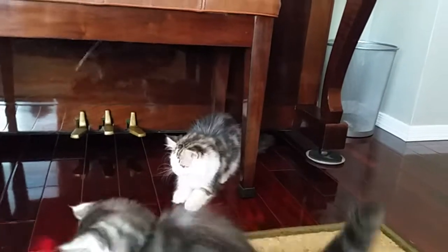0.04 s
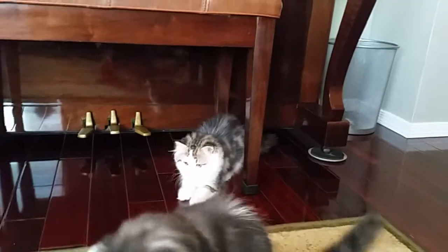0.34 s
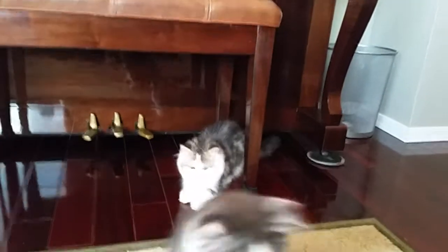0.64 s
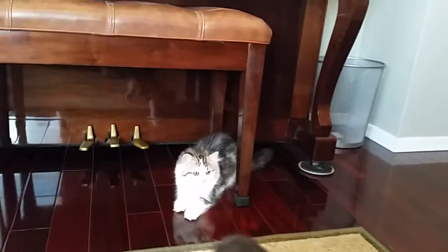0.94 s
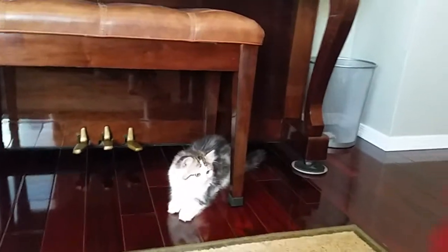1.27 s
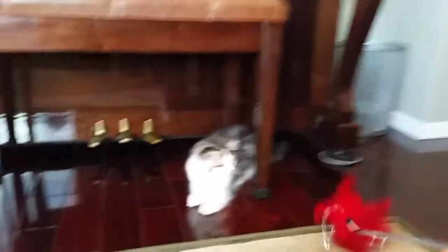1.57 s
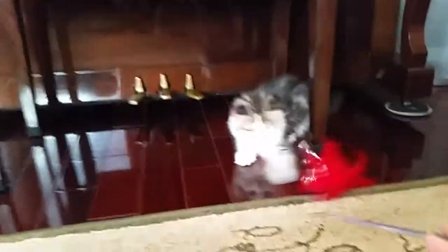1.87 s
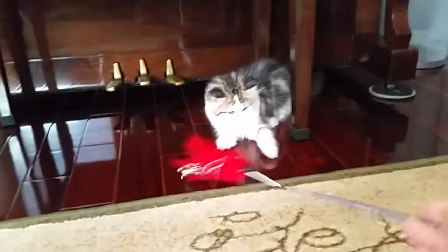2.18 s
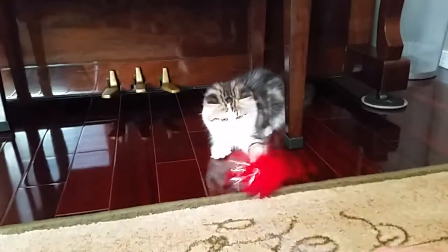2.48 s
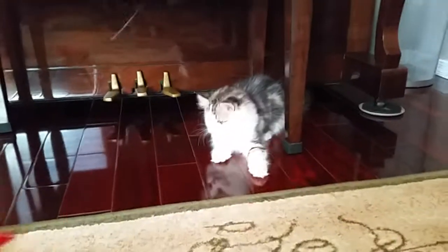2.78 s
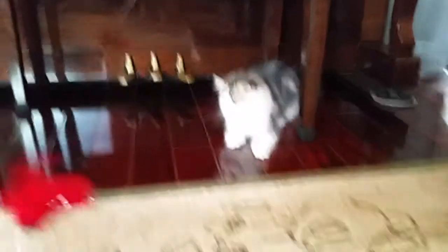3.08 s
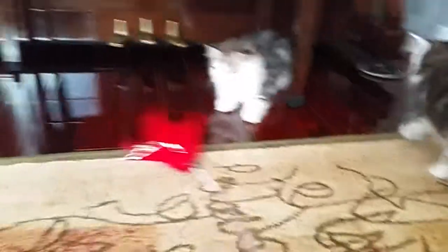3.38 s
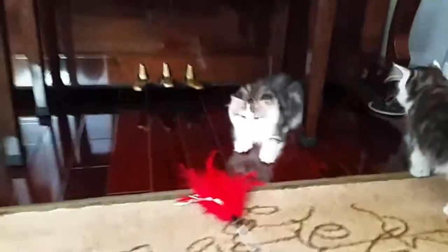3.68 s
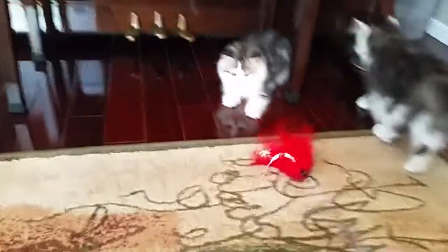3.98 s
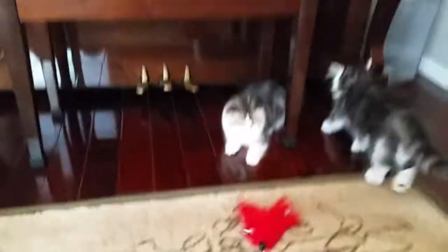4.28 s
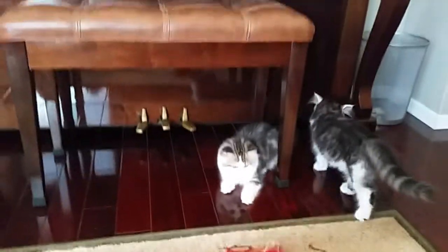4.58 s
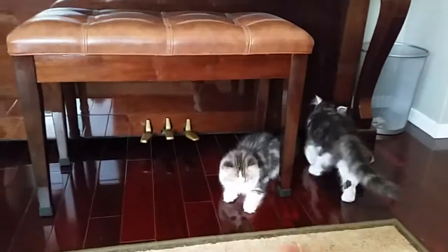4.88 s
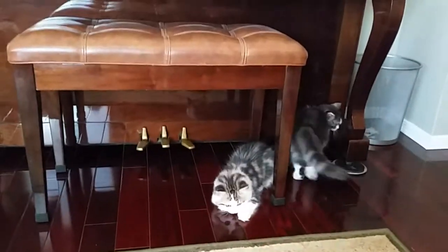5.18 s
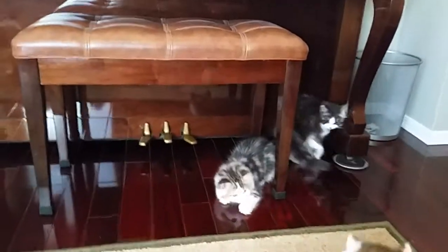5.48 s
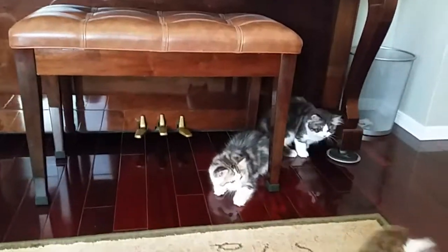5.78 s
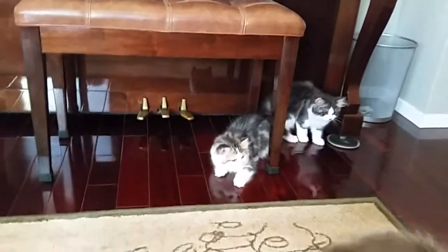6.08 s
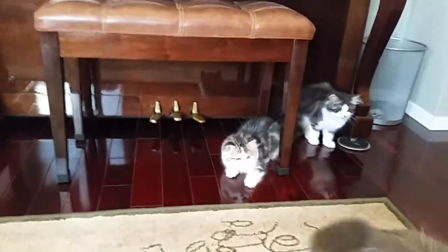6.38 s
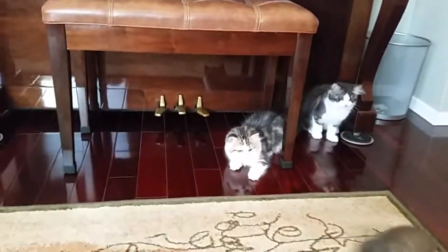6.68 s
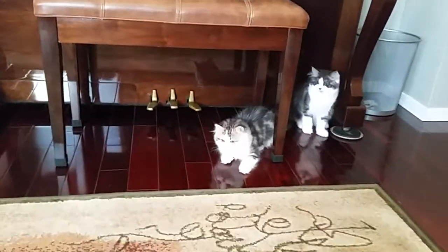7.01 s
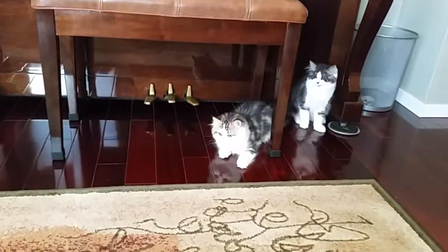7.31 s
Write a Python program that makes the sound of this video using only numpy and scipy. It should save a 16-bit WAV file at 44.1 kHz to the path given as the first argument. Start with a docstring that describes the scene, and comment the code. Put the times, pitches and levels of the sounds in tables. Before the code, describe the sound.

Faint, crisp crinkles of a feather-and-foil toy mix with soft low thumps of kittens playing, over a slight hum and hiss.

```python
"""A faint rustle over room air, then bright snaps and soft bumps: kittens play with a feather-and-tinsel
wand on a wooden floor and a rug. Foil strands tick and buckle high in the treble. Paws pat the boards;
low bumps of play and handling reach mostly the left microphone.
Underneath: the air of a quiet room, a faint mains hum and a narrow microphone hiss."""
import sys
import numpy as np
from scipy import signal
from scipy.fft import rfft, irfft
from scipy.io import wavfile
from scipy.ndimage import uniform_filter1d

SR = 44100
rng = np.random.default_rng(int(sys.argv[2]) if len(sys.argv) > 2 else 0)


def wav_record(signal):
    """Record a signal, one row per channel, as 16-bit PCM in the file named by sys.argv[1]."""
    frames = np.transpose(np.atleast_2d(signal))
    bounded = np.clip(frames, -1, 1)
    # unit amplitude maps onto the largest positive 16-bit level
    quanta = np.round(bounded * 32767).astype(np.int16)
    wavfile.write(sys.argv[1], SR, quanta)


N = 328545
TIME = np.arange(N) / SR

# Spells of wand motion. Each row: start and end in seconds, relative level in dB, upper-treble lift in dB.
WAND_BOUTS = [(0, 0.06, -71, -2), (0.518, 1.196, -59, 5), (1.424, 1.56, -68.5, 2), (1.57, 2.593, -57, 1.5),
              (2.622, 3.28, -58, -9), (3.883, 4.48, -80.5, 0), (4.497, 5.822, -60, -2.5),
              (5.996, 6.342, -69, 5), (6.346, 7.45, -61, 6)]
# Single shakes. Each row: crest in seconds, relative level in dB, length in seconds,
# upper-treble lift in dB.
WAND_SHAKES = [(0.37, -67, .015, -3), (0.44, -66.5, 0.033, -1), (0.567, -41.5, 0.0072, 2),
               (0.667, -39, 0.024, -4), (0.72, -42, .03, 3), (1.76, -50, .04, 3), (1.939, -40, 0.045, -7),
               (2.114, -41.5, 0.033, 0), (2.27, -46.5, 0.17, -4), (2.538, -46, 0.089, 1),
               (2.82, -52.5, 0.055, 5), (2.893, -50.5, 0.046, -10), (3.037, -50, 0.19, 0),
               (3.225, -47, 0.057, -9), (3.377, -50.5, 0.027, -11), (4.263, -68, .035, -2),
               (4.737, -47.5, 0.033, 5), (4.92, -44.5, 0.057, -6), (5.027, -47.5, .035, -2),
               (5.13, -50, 0.1, 4), (5.297, -53, .07, 6), (5.544, -47.5, 0.11, 0.5),
               (5.741, -46, 0.023, 3.5), (6.137, -54.5, 0.027, 3), (6.255, -57.5, 0.028, 7.5),
               (6.38, -50, 0.025, 6), (6.561, -52.5, 0.028, 12), (6.644, -61.5, 0.075, 14),
               (6.86, -50.5, .025, 2), (6.938, -43.5, 0.054, -8), (7.037, -46.5, .04, -2),
               (7.14, -44.5, 0.077, -2), (7.295, -44, 0.055, -5)]
# Wand direction. Each row: time in seconds, left over right in dB.
WAND_PAN = [(0, 3), (.9, 1), (2.6, .5), (3.25, 7.5), (3.5, 3), (6.2, -1), (7.45, 0.5)]
# Foil strand pitches in Hz.
FOIL_PITCHES_HZ = [9880, 10760, 12270, 12200, 13900, 14500]
# Flicks of the tuft. Each row: crest in seconds, relative level in dB, fade in seconds.
TUFT_SWATS = [(.702, -33.5, 0.016), (1.066, -31.5, 0.027), (2.103, -37, 0.021), (5.121, -37, 0.011),
              (6.405, -37, 0.022), (7.278, -40.5, 0.073)]
# Buckling strands. Each row: start in seconds, relative peak in dB, pitch in Hz, left over right in dB.
STRAND_SNAPS = [(.556, -27.5, 11500, 5), (.613, -30, 11600, 2), (.649, -30, 14900, 5),
                (.705, -20, 15000, 9), (0.7118, -15, 14000, 17), (.7284, -17, 14600, 8),
                (0.7543, -17.5, 12700, -2), (.938, -34, 14700, 12), (1.0674, -16, 11400, -9),
                (1.188, -29, 13600, -4), (2.193, -26, 15400, -5), (2.2957, -23.5, 10950, -4),
                (2.606, -23, 10600, 1.5), (2.79, -29, 14200, 14), (3.253, -24, 11300, 6),
                (3.3406, -30.5, 11700, 2), (4.6353, -34, 15200, 7), (4.7251, -27.5, 11100, -2),
                (4.869, -31, 13000, 2.5), (4.931, -24, 13800, 5), (5.12, -30, 15000, -2),
                (6.214, -33.5, 12200, 3), (6.403, -19, 14500, 4), (6.5606, -29, 15300, -15),
                (6.6322, -27, 15000, -12), (7.1262, -21, 11400, 7)]
# Soft bumps. Each row: start in seconds, level in dB, pitch in Hz, relative knock level in dB.
SOFT_BUMPS = [(0.572, -34, 87, -21), (1.452, -42, 98, -8.5), (1.53, -40, 83.4, -24),
              (1.659, -30.5, 100, -35), (1.689, -33, 147, -34), (1.705, -28, 104, -22.5),
              (1.756, -33, 128, -34), (1.823, -36, 108, -24), (2.065, -36, 98, -18),
              (2.145, -34.5, 95, -11), (2.191, -31, 86.6, -35), (2.541, -33, 77, -14),
              (3.052, -39, 142, -28), (3.079, -32.5, 85, -21), (3.094, -27, 96, -18.5),
              (3.131, -32.5, 66, -19.5), (3.155, -32, 120, -21), (3.247, -27.5, 88, -24),
              (3.275, -40, 121, -10), (3.382, -38, 106, -15), (3.481, -31.5, 99, -31),
              (3.641, -37.5, 121, -22), (3.803, -26.5, 99, -25.5), (4.49, -38.5, 145, -30),
              (4.613, -33, 104, -35), (4.759, -35, 88, -35), (5.539, -35, 112, -23),
              (7.308, -37.5, 68, -26)]
# Hard taps on the boards. Each row: start in seconds, level in dB, left over right in dB.
BOARD_TAPS = [(.509, -44.5, 8), (0.707, -43, 6), (.735, -33.5, -16), (1.066, -54, -5), (6.402, -29, -8)]
# Short hollow notes of the boards: low paw pats, and the higher double ring of the hard tap at 6.4 s.
# Each row: start in seconds, level in dB, pitch in Hz.
BOARD_NOTES = [(0.799, -49, 288), (0.84, -59, 336), (5.552, -44.5, 343), (6.25, -46.5, 326),
               (6.334, -56, 310), (6.402, -54, 1010), (6.414, -51, 965), (7.06, -45.5, 335),
               (7.159, -50.5, 383), (7.271, -52, 270), (7.343, -43, 243)]

# Level curves. Each row: time in seconds, relative level in dB.
SHUFFLE_LEVEL = [(0, -64), (1.3, -59), (1.7, -43.5), (2.2, -47.5), (2.8, -52.5), (3.2, -47.5), (3.7, -46),
                 (4.1, -53.5), (5.5, -62), (7.45, -64)]
AIR_AND_HISS_LEVEL = [(0.0, -61.5), (0.1, -60.5), (0.29, -63), (0.89, -58.5), (1.33, -59.5), (3.26, -58),
                      (4.38, -62), (5.1, -58), (6.02, -60), (6.35, -58), (7.43, -58), (7.45, -56)]

# Spectra. Each row: frequency in Hz, relative level in dB.
TINSEL_SPECTRUM = [(500, -33), (2000, -26), (4500, -22), (7500, -21), (8500, -15.5), (9400, -4),
                   (10200, -2.5), (11500, 1.5), (13500, -5), (15500, 2), (17000, -17.5)]
KNOCK_SPECTRUM = [(60, -9), (160, -3.5), (240, 9), (400, 0), (900, -8), (1200, -22.5), (3000, -30),
                  (8000, -79)]
TAP_SPECTRUM = [(200, -17), (900, -4), (2000, -7.5), (3500, 0.5), (5500, -3.5), (8500, -1.5), (11000, 6),
                (16000, 4)]
SCRAPE_SPECTRUM = [(700, -38), (1250, -4), (1550, 2), (1720, 1), (1950, -20), (3000, -42)]
SHUFFLE_SPECTRUM = [(10, -20), (35, -3), (65, 0), (110, -2.5), (170, -4), (300, -25.5), (600, -25),
                    (2000, -71.5)]
AIR_SPECTRUM = [(15, -8), (30, -7.5), (60, -1), (105, 2.5), (170, -10.5), (260, -13), (450, -17.5),
                (900, -19.5), (1300, -25), (2000, -37.5), (3600, -27), (6500, -51), (8500, -88),
                (11000, -40), (16000, -40.5)]
HISS_SPECTRUM = [(1500, -32), (2400, -30.5), (2800, -14.5), (3150, -1.5), (3450, 3), (3850, 0.5),
                 (4300, -8.5), (4900, -27), (6500, -33.5)]

# Width of the room air. Each row: frequency in Hz, left-right correlation.
AIR_CORRELATION = [(30, 0.55), (120, 0.85), (300, 0.68), (700, 0.065), (2000, 0.029), (16000, 0.033)]
# Balance of the room air. Each row: frequency in Hz, left over right in dB.
AIR_PAN = [(40, 10), (110, -2), (400, -1.5), (900, 8), (2000, -1), (12000, 1.5)]
# Room decay. Each row: frequency in Hz, T60 in seconds.
ROOM_T60 = [(200, 0.5), (1000, 0.37), (4000, 0.84), (8000, 0.48), (15000, 0.1)]
# Notches of the left microphone port. Each row: frequency in Hz, gain in dB.
LEFT_PORT_GAIN = [(4600, 1), (5800, -14.5), (7000, -4), (8400, -25.5), (10000, 1)]


def rustle(gain_db=2.5, upper_db=0.5, clump_db=2.0, split_hz=12500):
    """Foil strands tick against each other, each pitch in its own short clumps."""
    out = np.zeros((2, N))
    lower, upper = tuft_motion()
    for hz in FOIL_PITCHES_HZ:
        clumps = wander(400, 150)
        motion = upper * amp(upper_db) if hz > split_hz else lower
        strength = motion * amp(gain_db + clump_db * np.minimum(clumps, 2))
        ticks = through(strength * crackle(per_s=400, spread_db=1.5), strand_tick(hz))
        out += room(ticks, early_db=-5, late_db=-6)
    return out * pan(curve(WAND_PAN)) / np.sqrt(len(FOIL_PITCHES_HZ))


def tuft_motion(rest_db=-81.5, surge_db=1.73):
    """Lower- and upper-treble tick strength: bouts and shakes add in power and surge unevenly."""
    moves = [(amp(db) * swell(start_s, end_s, rise_s=0.017, fade_s=0.052), lift_db)
             for start_s, end_s, db, lift_db in WAND_BOUTS]
    moves += [(amp(db) * swell(crest_s, crest_s, 0.66 * length_s, 0.85 * length_s), lift_db)
              for crest_s, db, length_s, lift_db in WAND_SHAKES]
    lower_power = sum(move ** 2 for move, _ in moves)
    upper_power = sum((move * amp(lift_db)) ** 2 for move, lift_db in moves)
    surge = amp(surge_db * wander(1200, 400))
    return np.sqrt(np.array([lower_power, upper_power]) + amp(rest_db) ** 2) * surge


def strand_tick(pitch_hz, boost_db=9, log_width=0.041):
    """One foil tick: the tinsel spectrum, raised around the strand's pitch."""
    hz = np.geomspace(300, 20000, num=120)
    peak_db = boost_db * np.exp(-(np.log(hz / pitch_hz) / log_width) ** 2)
    return impulse(np.column_stack([hz, at_hz(TINSEL_SPECTRUM, hz) + peak_db]), fft_size=512)


def swats(gain_db=-1, pan_db=-0.5):
    """A flick of the tuft sets off a dense, fast-fading burst of ticks."""
    envelope = sum(amp(db + gain_db) * (TIME >= start_s) * np.exp(-abs(TIME - start_s) / fade_s)
                   for start_s, db, fade_s in TUFT_SWATS)
    clicks = pan(pan_db) * envelope * crackle(per_s=1800, spread_db=2.0)
    return room(through(clicks, impulse(TINSEL_SPECTRUM)), early_db=-0.5, late_db=-1.0)


def snaps(gain_db=-4, rebound=0.57, rebound_s=0.0028):
    """One strand buckles with a sharp tick; its neighbours rebound."""
    out, t = np.zeros((2, N)), TIME[:500]
    for start_s, db, hz, pan_db in STRAND_SNAPS:
        signs = rng.choice([-1, 1], (2, len(t)))
        clicks = rebound * signs * (rng.random(len(t)) < .25) * np.exp(-t / rebound_s)
        clicks[:, 0] = 1  # the buckle
        tick = strand_tick(hz, boost_db=11.5, log_width=0.15)
        add(out, start_s, amp(db + gain_db) * pan(pan_db) * through(clicks, tick / abs(tick).max()))
    return room(out, early_db=-7, late_db=-5)


def bumps(knock_db=11, overtone_ratio=2.32, overtone_db=-11, pan_db=19):
    """Heavily damped low pushes, each with one overtone and a small woody knock."""
    out, knock = np.zeros((2, N)), impulse(KNOCK_SPECTRUM)
    for start_s, db, hz, hard_db in SOFT_BUMPS:
        push = thud(hz, rise_cycles=0.37) + amp(overtone_db) * thud(hz * overtone_ratio, rise_cycles=0.84)
        add(out, start_s, amp(db) * pan(pan_db) * push)
        add(out, start_s, amp(db + hard_db + knock_db) * pan(pan_db) * knock / abs(knock).max())
    return room(out, early_db=-11, late_db=-14)


def taps(contact_s=0.0021):
    """Short, hard contacts with the boards set the room ringing."""
    blows, t = np.zeros((2, N)), TIME[:400]
    for start_s, db, pan_db in BOARD_TAPS:
        burst = rng.standard_normal((2, len(t))) * np.exp(-t / contact_s)
        add(blows, start_s, amp(db) * pan(pan_db) * burst)
    return room(through(blows, impulse(TAP_SPECTRUM)), early_db=-3, late_db=-2.5)


def board_notes(pan_db=1):
    """The boards answer paws, and one hard tap, with short hollow notes."""
    out = np.zeros((2, N))
    for start_s, db, hz in BOARD_NOTES:
        add(out, start_s, amp(db) * pan(pan_db) * thud(hz, rise_cycles=0.4))
    return room(out, early_db=6.5, late_db=2)


def thud(hz, rise_cycles):
    """A damped swing whose envelope peaks at 1 after rise_cycles."""
    cycles = hz * TIME[:6000]
    return cycles / rise_cycles * np.exp(1 - cycles / rise_cycles) * np.sin(2 * np.pi * cycles)


def scrape(start_s=1.12, end_s=1.425, level_db=-66):
    """One soft, brief slide: an arch of band noise."""
    progress = np.clip((TIME - start_s) / (end_s - start_s), 0, 1)
    return amp(level_db) * np.sqrt(abs(np.sin(np.pi * progress))) * noise(SCRAPE_SPECTRUM)


def shuffle(gain_db=-3, pan_db=10):
    """Many small bumps merge into a lumpy rumble."""
    lumps = unit_rms(through(crackle(per_s=110, spread_db=1.5), impulse(SHUFFLE_SPECTRUM)))
    return lumps * amp(curve(SHUFFLE_LEVEL) + gain_db) * pan(pan_db)


def room_air(gain_db=7.5):
    """Low room noise, most alike at the two microphones in the bass."""
    hz = np.fft.rfftfreq(N, 1 / SR)
    air = noise(AIR_SPECTRUM, at_hz(AIR_CORRELATION, hz)) * amp(curve(AIR_AND_HISS_LEVEL) + gain_db)
    return irfft(rfft(air) * pan(at_hz(AIR_PAN, hz)), N)


def mic_hiss(gain_db=2, pan_db=21):
    """Narrow hiss of the resonant left microphone port."""
    return noise(HISS_SPECTRUM) * amp(curve(AIR_AND_HISS_LEVEL) + gain_db) * pan(pan_db)


def mains_hum(hz=116.7, level_db=-62.5, waver=0.41):
    """One low tone, drifting in level and phase."""
    level_drift, phase_rad = wander(16000, 6000, shape=(2, N))
    envelope = np.sqrt(2) * amp(level_db) * (1 + waver * level_drift)
    return envelope * np.sin(2 * np.pi * hz * TIME + phase_rad)


def room(x, early_db, late_db, early_s=0.016):
    """Direct sound, quick reflections from floor and furniture, and the room's tail."""
    t = TIME[:SR // 2]
    shape = (2, len(t))
    echoes = rng.standard_normal(shape) * (rng.random(shape) < .15) * (t > .001)
    early = echoes * np.exp(-t / early_s)
    hz, frame_s, bins = signal.stft(rng.standard_normal(shape) * (t > .006), SR, nperseg=256)
    decay = amp(-60 * frame_s / at_hz(ROOM_T60, hz)[:, None])
    late = signal.istft(bins * decay, SR, nperseg=256)[1][:, :len(t)]
    response = amp(early_db) * unit_rms(early) + amp(late_db) * unit_rms(late)
    return x + through(x, response / np.sqrt(len(t)))


def crackle(per_s, spread_db):
    """Random clicks of unequal size, different at each microphone."""
    hits = rng.random(N) < per_s / SR
    sizes = amp(spread_db * np.minimum(rng.exponential(1, N), 4))
    mic_gains = rng.uniform(-1.29, 1.76, (2, N))
    return unit_rms(hits * sizes * mic_gains * rng.choice([-1, 1], N))


def noise(spectrum, correlation=0):
    """Steady coloured stereo noise, rms 1."""
    hz = np.fft.rfftfreq(N, 1 / SR)
    left, other = rfft(rng.standard_normal((2, N)))
    right = correlation * left + np.sqrt(1 - correlation ** 2) * other
    return unit_rms(irfft(np.array([left, right]) * amp(at_hz(spectrum, hz)), N))


def impulse(spectrum, fft_size=4096):
    """Minimum-phase impulse response of a spectrum, energy 1."""
    hz = abs(np.fft.fftfreq(fft_size, 1 / SR))
    log_gain = np.log(amp(at_hz(spectrum, hz)))
    response = np.exp(np.conj(signal.hilbert(log_gain)))
    pulse = np.fft.ifft(response).real[:fft_size // 2]
    return pulse / np.linalg.norm(pulse)


def wander(first_samples, second_samples, shape=N):
    """Noise smoothed by two moving averages, rms 1."""
    smooth = uniform_filter1d(rng.standard_normal(shape), first_samples)
    return unit_rms(uniform_filter1d(smooth, second_samples))


def swell(start_s, end_s, rise_s, fade_s):
    """Envelope: 1 from start to end, exponential flanks."""
    return np.exp(-np.maximum(start_s - TIME, 0) / rise_s - np.maximum(TIME - end_s, 0) / fade_s)


def pan(pan_db):
    """Left and right gains, mean power 1."""
    pair = np.array([amp(pan_db / 2), amp(-pan_db / 2)]).reshape(2, -1)
    return pair / np.sqrt(np.mean(pair ** 2, 0))


def at_hz(rows, hz):
    """Interpolates (Hz, value) rows on a log axis."""
    row_hz, values = np.transpose(rows)
    return np.interp(np.log(hz + 1), np.log(row_hz + 1), values)


def curve(rows):
    """Interpolates (seconds, value) rows at every sample."""
    return np.interp(TIME, *np.transpose(rows))


def add(mix, start_s, sound):
    part = mix[:, max(round(start_s * SR), 0):][:, :sound.shape[1]]
    part += sound[:, :part.shape[1]]


def through(x, response):
    return signal.fftconvolve(x, np.atleast_2d(response), axes=1)[:, :N]


def amp(db):
    return 10 ** (np.asarray(db) / 20)


def unit_rms(x):
    return x / np.sqrt(np.mean(x ** 2) + 1e-20)


def scene():
    """All sources at the two microphones."""
    tinsel = rustle() + swats() + snaps()
    floor = taps() + bumps() + board_notes() + scrape() + shuffle()
    return tinsel + floor + room_air() + mic_hiss() + mains_hum()


def record(dry, cutoff_hz=15900):
    """The left port notches the mid treble; both channels are low-passed."""
    port_gain = amp(at_hz(LEFT_PORT_GAIN, np.fft.rfftfreq(N, 1 / SR)))
    left = irfft(rfft(dry[0]) * port_gain, N)
    lowpass = signal.firwin(301, cutoff_hz, window=("kaiser", 8), fs=SR)
    return signal.oaconvolve(np.array([left, dry[1]]), lowpass[None], "same")


dry = scene()
out = record(dry)
wav_record(out)
```